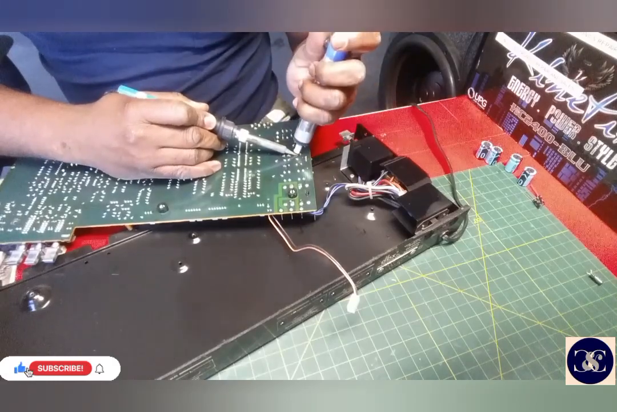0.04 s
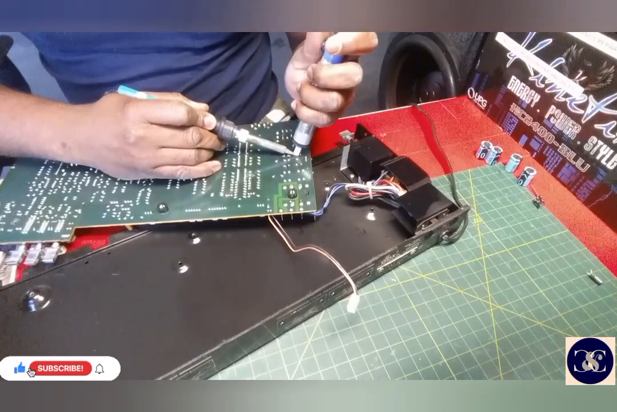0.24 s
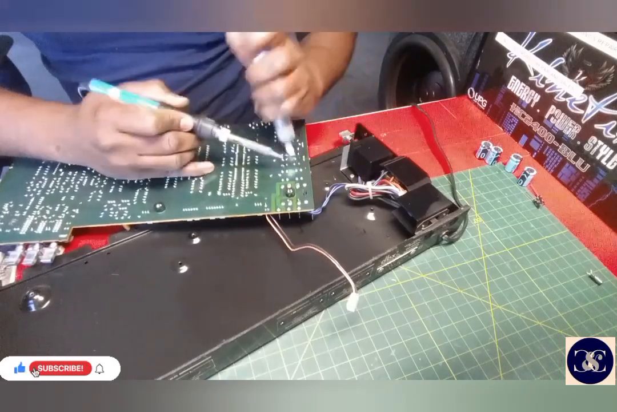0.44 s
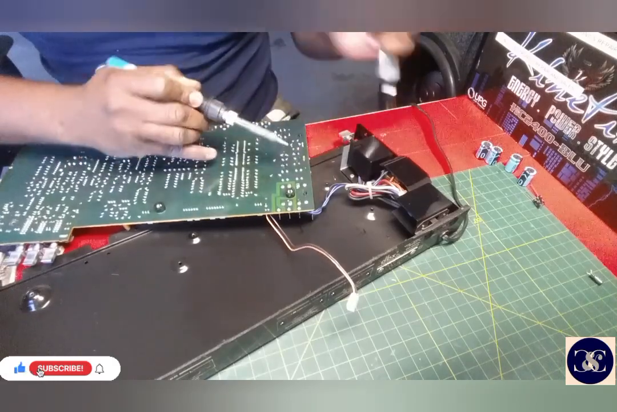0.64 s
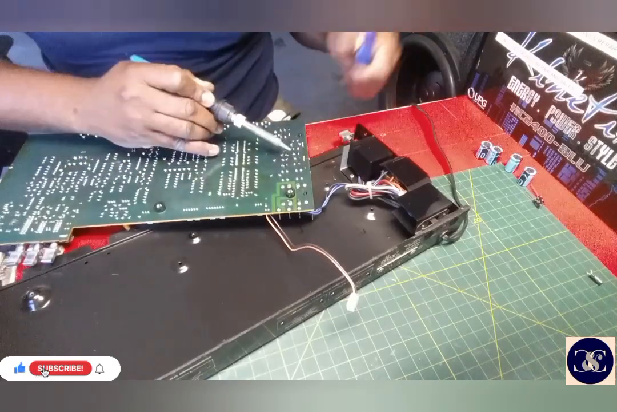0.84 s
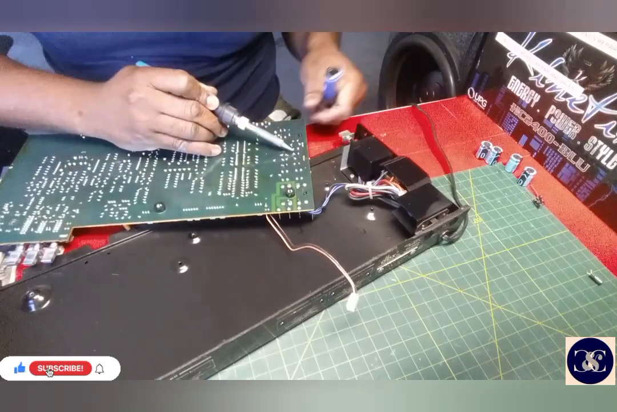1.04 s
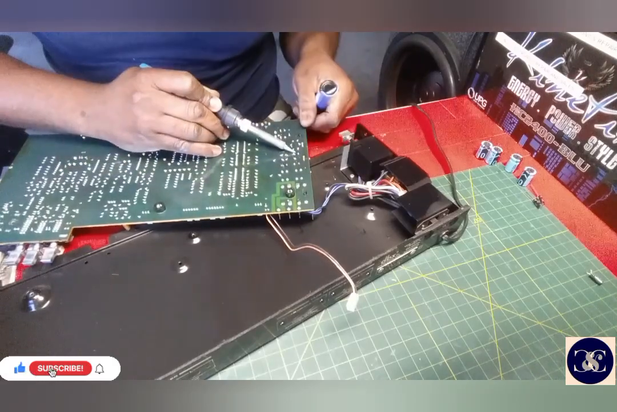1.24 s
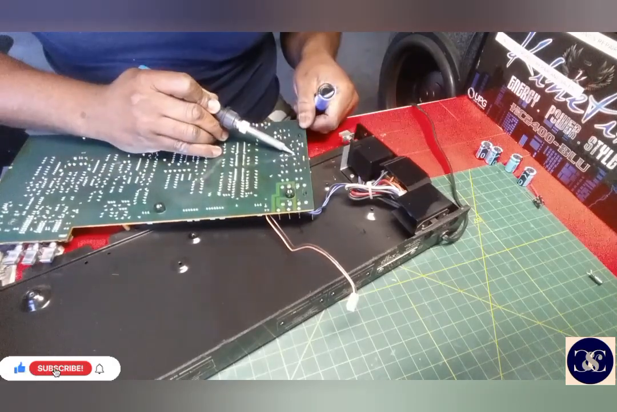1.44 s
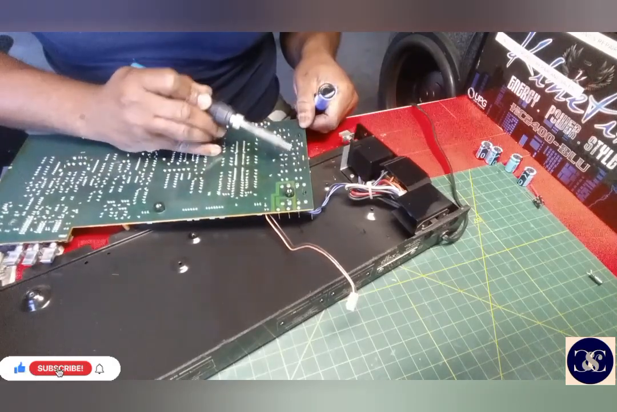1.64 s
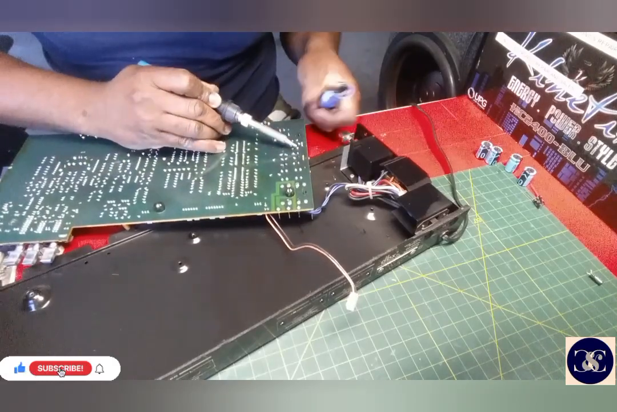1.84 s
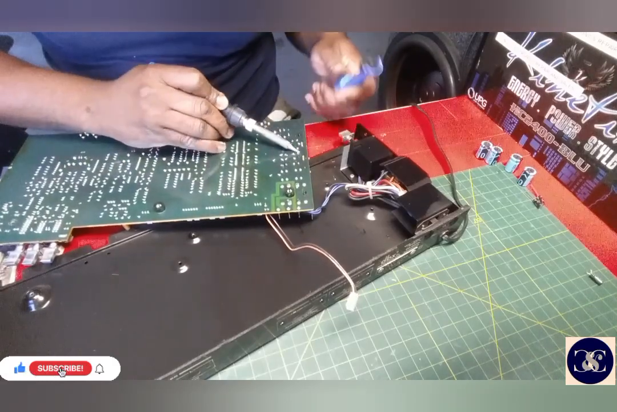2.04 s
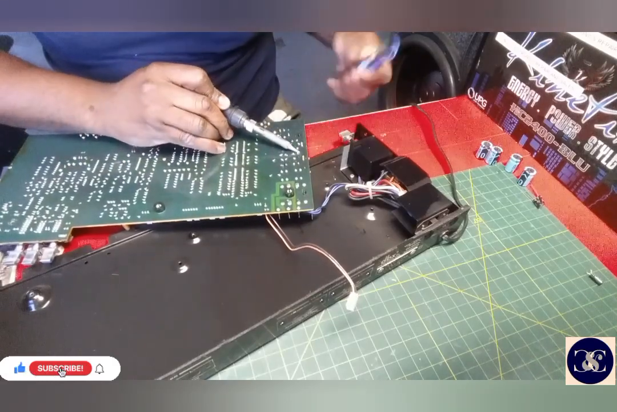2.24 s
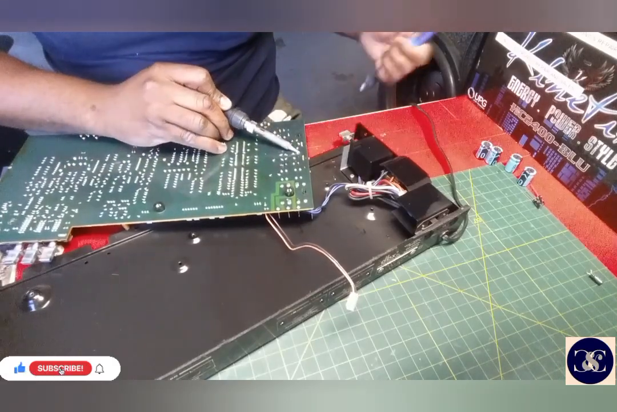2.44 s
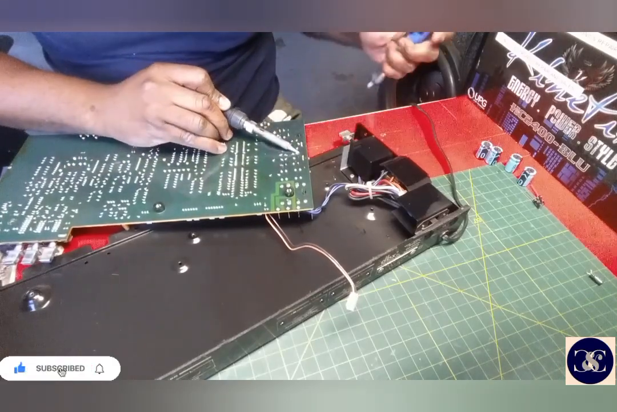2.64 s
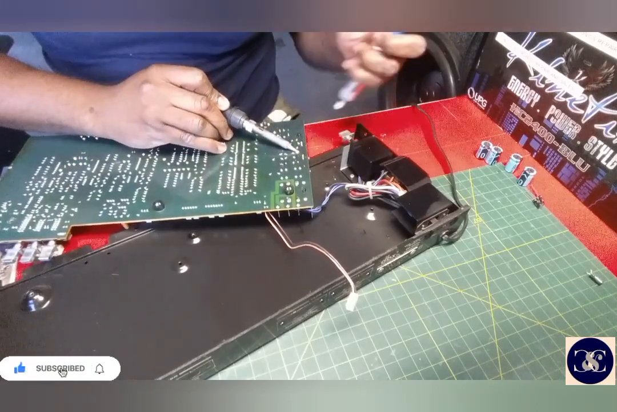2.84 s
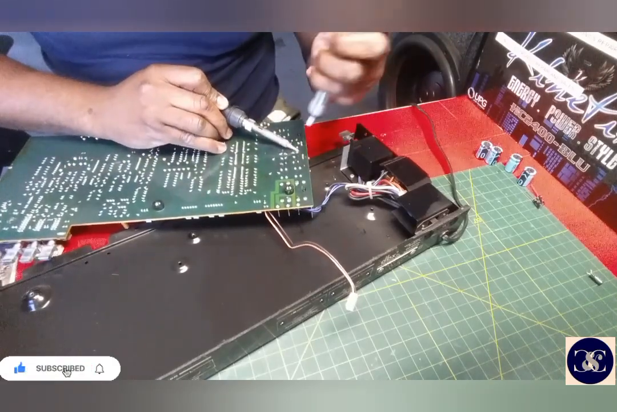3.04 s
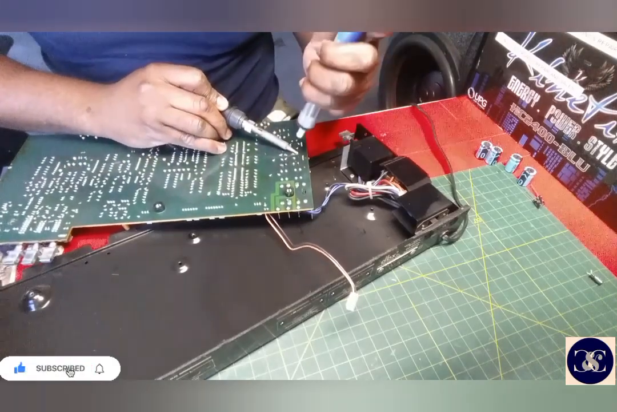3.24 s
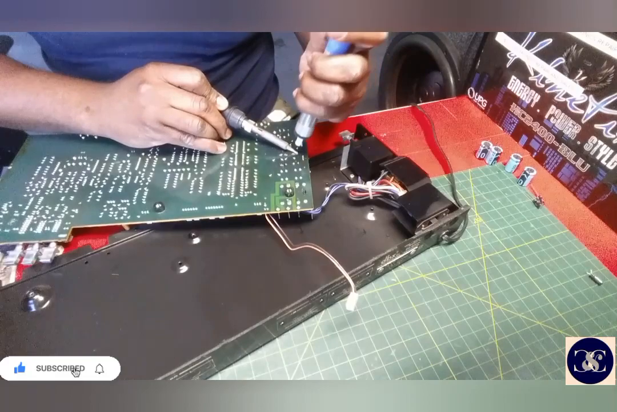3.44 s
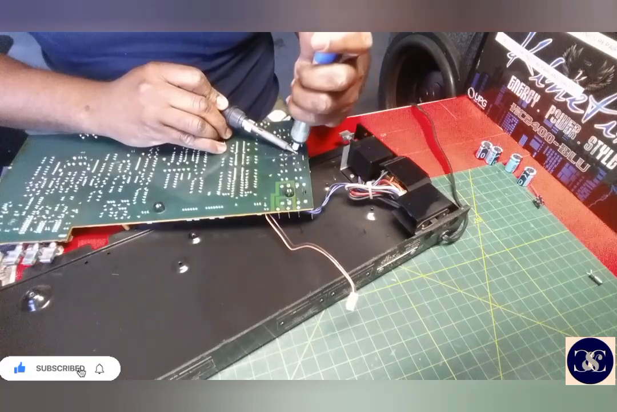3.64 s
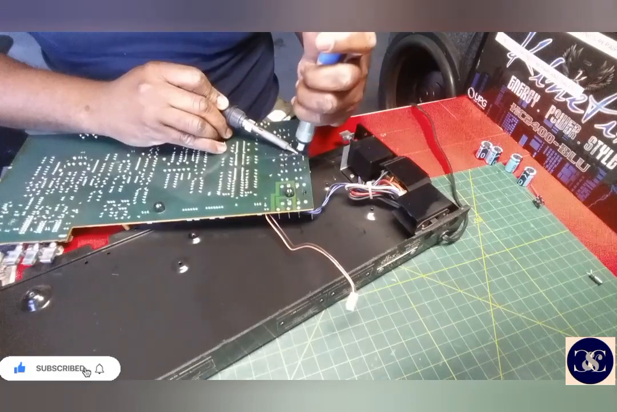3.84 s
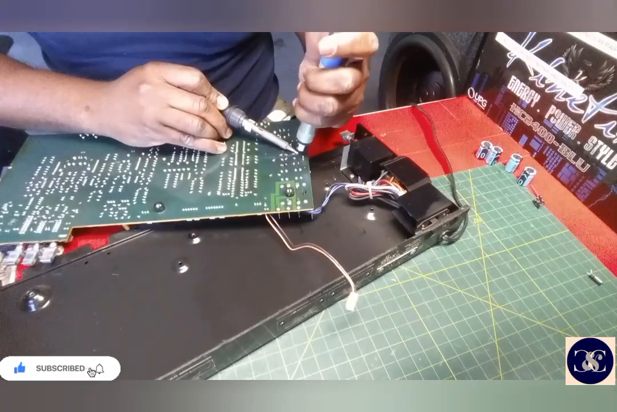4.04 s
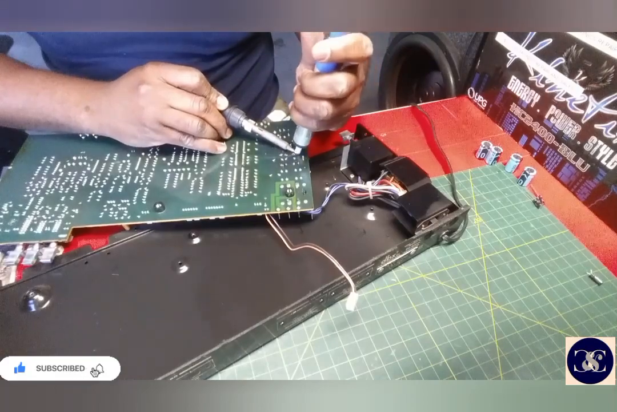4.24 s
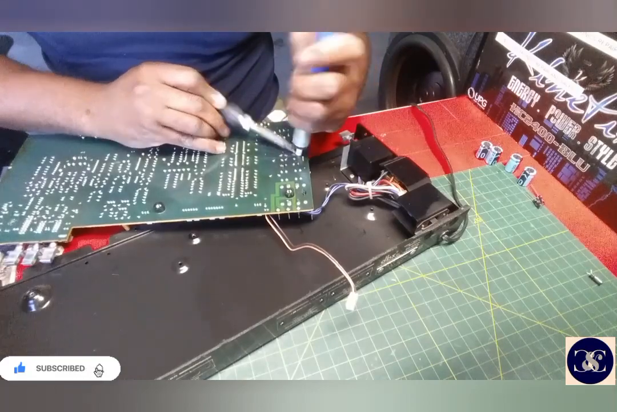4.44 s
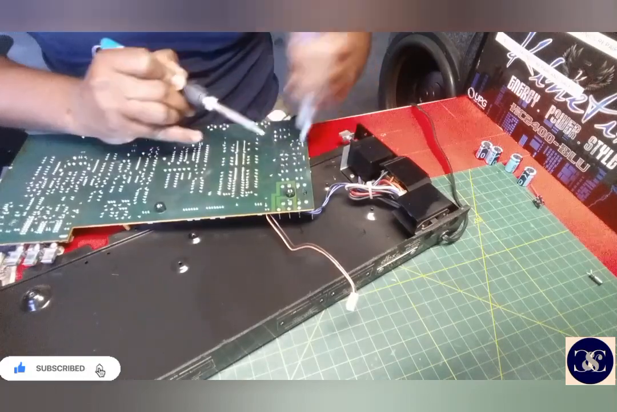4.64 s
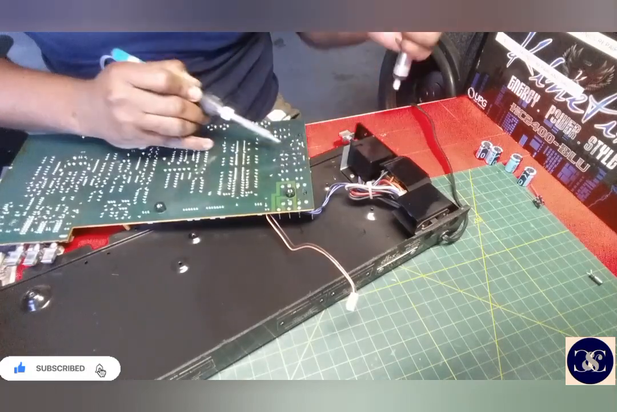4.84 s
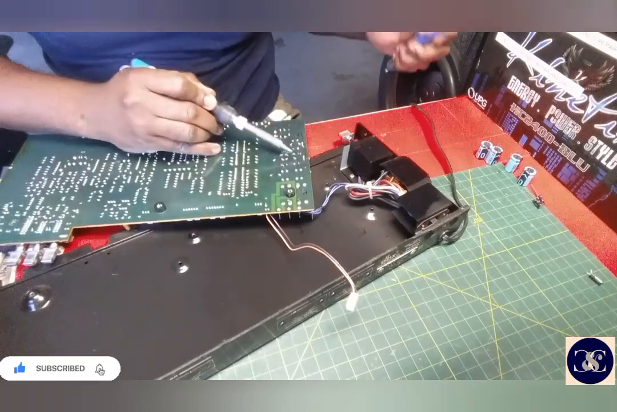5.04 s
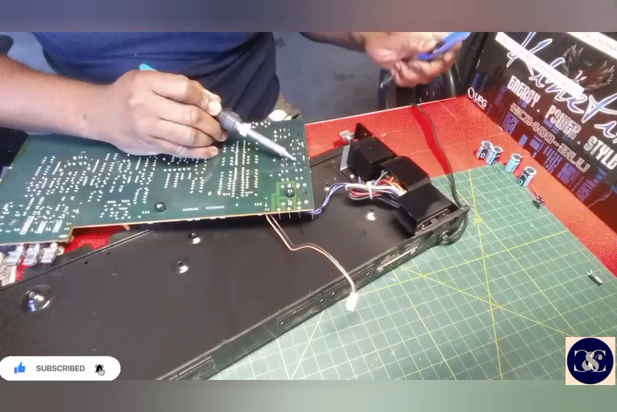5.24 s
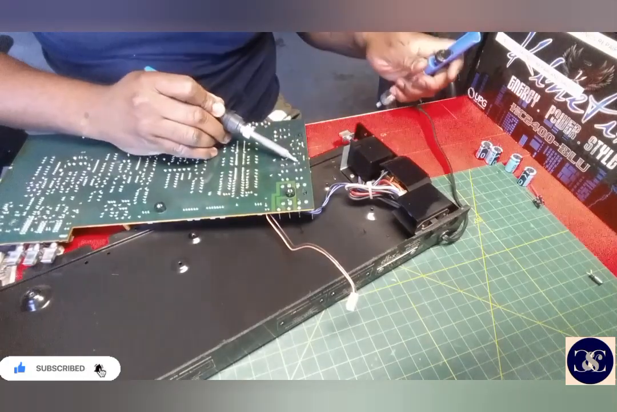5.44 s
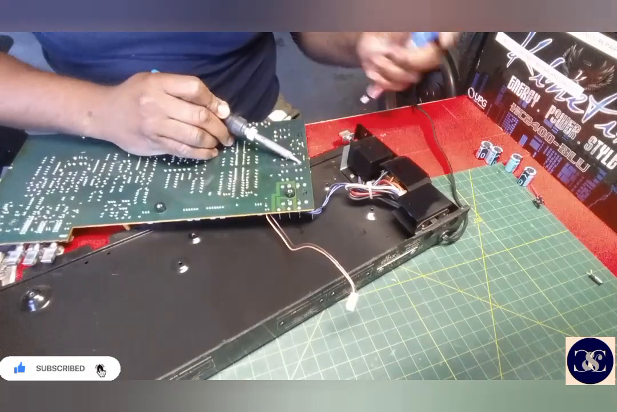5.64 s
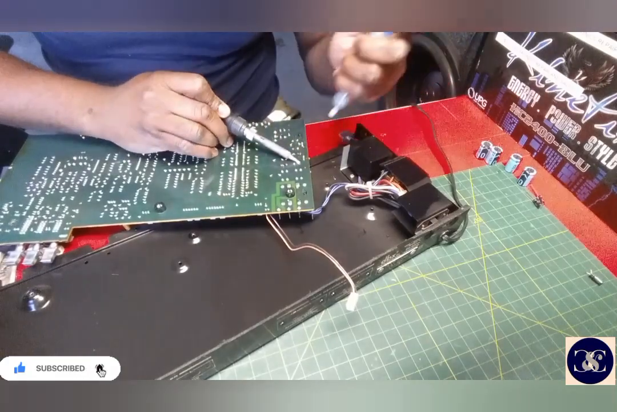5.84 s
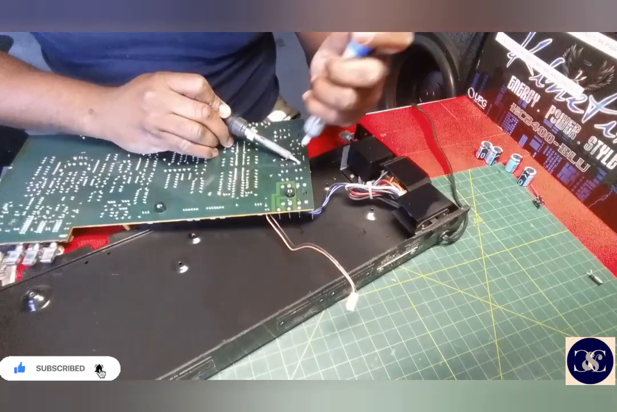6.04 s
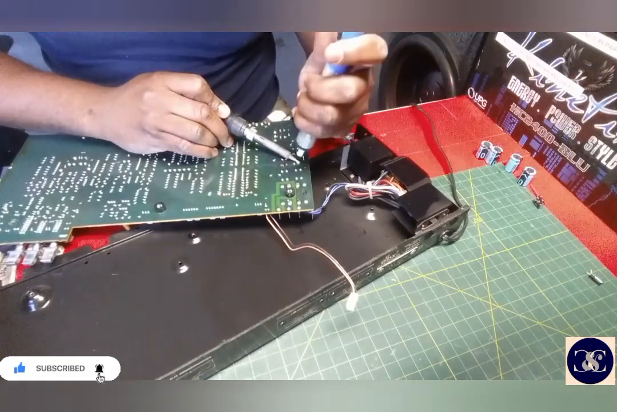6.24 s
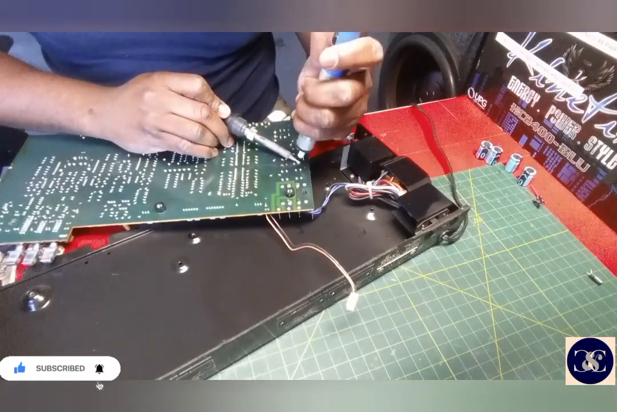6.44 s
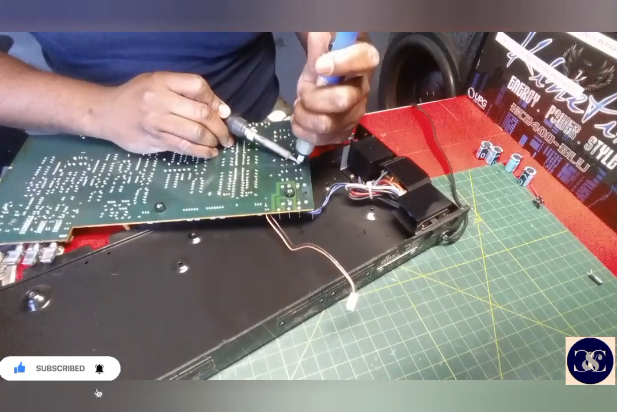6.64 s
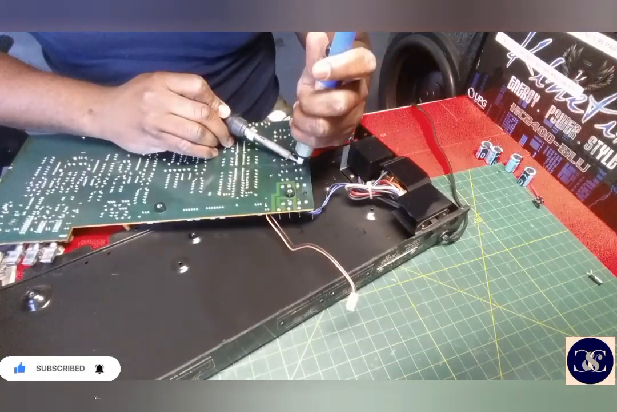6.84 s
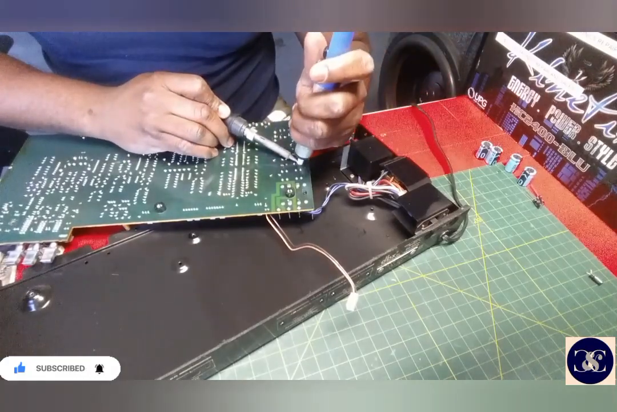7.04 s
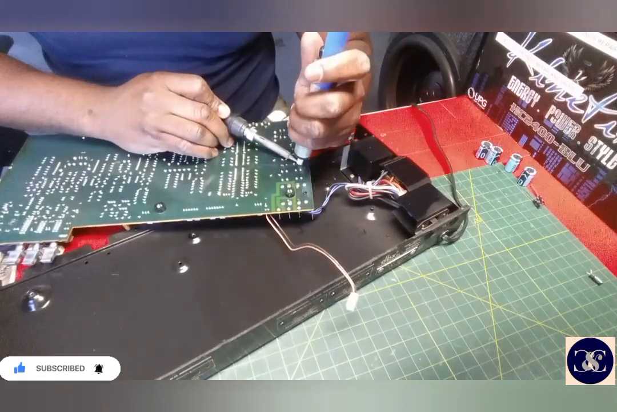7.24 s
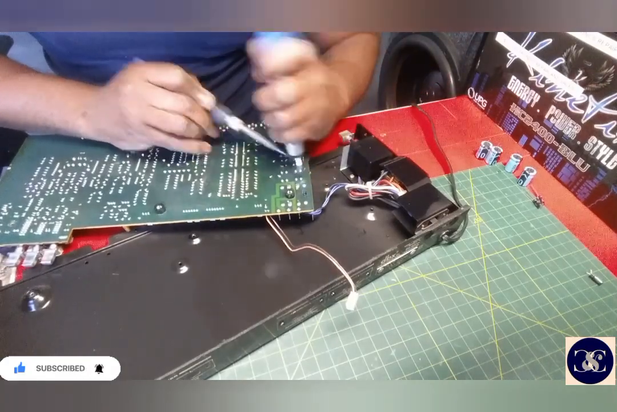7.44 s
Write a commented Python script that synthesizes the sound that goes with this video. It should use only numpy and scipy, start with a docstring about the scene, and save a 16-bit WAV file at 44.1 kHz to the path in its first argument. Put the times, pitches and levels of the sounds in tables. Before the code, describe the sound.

A low electrical hum with rumble and faint hiss runs throughout, swelling at the start, around 2 seconds, around 4 seconds and from 6 seconds onward. At about 0.45 seconds a spring-loaded desoldering pump fires with a sharp snap, and a loose circuit board bounces briefly on its chassis. From 1.7 to 2.4 seconds come small clicks and hollow board knocks. The plunger scrapes in and latches with a loud, bright click at 2.6, followed by a softer click and a small ringing snap near 3 seconds. At 4.6 the pump fires harder, with a short metallic ring and board clatter. It is re-cocked with a lighter click at 5.1 and a faint tick at 5.3. Only the hum remains until a last hard snap at about 7.5 seconds. Everything is close, with short small-room reverberation.

```python
"""A spring-loaded desoldering pump is fired three times and re-cocked twice over a circuit board.
Its piston rushes up the barrel and slams home, exciting the damped modes of spring and barrel; the
plunger scrapes in, latches and slides back. The loose board knocks on its chassis and rings.
A low mains hum swells and sinks; the small room reverberates into two close microphone ports."""
import sys
import numpy as np
from scipy import signal
from scipy.fft import rfft, irfft
from scipy.io import wavfile

SR = 44100
rng = np.random.default_rng(int(sys.argv[2]) if len(sys.argv) > 2 else 0)


def transcribe(u):
    """Save the signal u as a 16-bit wav file named by the first command-line argument.

    u: samples, shape (n,) or (channels, n), limited to [-1, 1]; the rate is SR.
    q: integer samples, one column per channel.
    """
    v = np.clip(np.atleast_2d(u).T, -1, 1)
    q = np.round(v * 32767).astype(np.int16)
    wavfile.write(sys.argv[1], SR, q)


N = 330750
TIME = np.arange(N) / SR
BLOW_TIME = TIME[:SR // 2]

# Modes of the board on its chassis. Each row: frequency in Hz, level in dB, t60 in seconds.
BOARD_MODES = [(36, -10, .25), (58.5, -7, .15), (103.04, -4.5, 0.24), (134.37, 2.5, 0.14), (172, -4, 0.081),
               (220.9, -1.5, .1), (310, -12, 0.08), (349.4, -9.5, 0.082), (403, -9.5, 0.07),
               (507, -10, 0.077), (725, -12, 0.17), (1045, -1.5, 0.065), (1303, -2.5, 0.097),
               (1513, -4.5, 0.058), (2095, -0.5, 0.071), (2600, -6, 0.081), (2940, -5, 0.05),
               (3675, -10, .06), (4420, -8, .08), (6200, -16, 0.055), (6900, -11, .06)]
# Modes of spring and barrel. Each row: frequency in Hz, level in dB, t60 in seconds.
PUMP_MODES = [(1140, -16.5, .16), (1745, -14.5, 0.085), (2131, -11, .17), (2420, -4.5, .12), (2610, 2, .19),
              (2220, -13.5, 0.16), (2015, -13, .13), (2960, -18, .16), (3260, -12.5, 0.15),
              (4280, -12, 0.09), (4740, -16, 0.13), (6340, -11.5, 0.058), (6305, -10.5, 0.14),
              (6230, -9, 0.1), (7100, -9, 0.11), (6770, -7, .1), (7290, -8, 0.14), (7230, -9, .1),
              (9560, -16.5, .08), (10690, -12, 0.14)]
# Lone snaps of the spring. Each row: time in seconds, level in dB, relative thump and ring in dB,
# t60 in seconds.
LONE_SNAPS = [(0.418, -27, -15, -15, 0.058), (2.9717, -19.5, -26, -3.5, 0.085)]
# Firings on the board. Each row: time in seconds, level in dB, relative ring in dB.
FIRINGS = [(0.4489, -12.5, -19.5), (4.5739, -8, -5.5), (7.498, -7, -7.5)]
# Cockings of the plunger. Each row: latch time in seconds, levels of latch, scrape and eased scrape
# in dB, back-stop time in seconds, its level in dB.
COCKINGS = [(2.6034, 1.5, -29, -29.5, 2.7675, -13), (5.091, -7.5, -39, -48, 5.3, -24)]


def amp(db):
    """Amplitude ratio of a level in decibels."""
    return 10 ** (np.asarray(db) / 20)


def along(hz, points):
    """Interpolation of (Hz, value) points on a logarithmic frequency axis."""
    f, value = np.transpose(points)
    return np.interp(np.log(np.maximum(hz, 1)), np.log(f), value)


def response(points, size=2048):
    """Minimum-phase impulse response of unit energy, shaped by (Hz, dB) points."""
    cepstrum = irfft(np.log(amp(along(np.fft.rfftfreq(size, 1 / SR), points))))
    cepstrum[1:size // 2] *= 2
    cepstrum[size // 2 + 1:] = 0
    h = irfft(np.exp(rfft(cepstrum)))
    return h / np.linalg.norm(h)


def coloured(x, points, size=2048):
    """Convolution shapes the spectrum of both channels and conserves the power of white noise."""
    return signal.fftconvolve(x, response(points, size)[None], axes=1)[:, :x.shape[1]]


def port_noise(count, coherent_hz=700):
    """Spatial coherence: white noise at two ports is alike in the bass, unrelated in the treble."""
    mid, side = rfft(rng.standard_normal((2, count)))
    coherence = 1 / (1 + (np.fft.rfftfreq(count, 1 / SR) / coherent_hz) ** 2)
    mid, side = mid * np.sqrt(1 + coherence), side * np.sqrt(1 - coherence)
    return irfft(np.array([mid + side, mid - side]), count) / np.sqrt(2)


def fade(t60):
    """Exponential damping: the level falls 60 dB in t60 seconds."""
    return np.exp(-np.log(1000) * BLOW_TIME / max(t60, .002))


def burst(t60, rise_s):
    """Broadband excitation: the dense chatter of a hard contact as quickly dying noise."""
    return port_noise(len(BLOW_TIME)) * fade(t60) * (1 - np.exp(-BLOW_TIME / rise_s))


def ring(modes, colour, scatter_db, spread_hz=1300):
    """Modal superposition: damped sines weighted by the spectrum of the blow."""
    out = 0
    for hz, db, t60 in modes:
        size, polarity, *lag = rng.standard_normal(4)
        # high modes reach the two ports out of step
        phase = 2 * np.pi * hz * BLOW_TIME + np.array(lag)[:, None] * hz / spread_hz
        envelope = fade(t60) * (1 - np.exp(-(2 * hz * BLOW_TIME) ** 2))  # half a cycle to build up
        gain = np.sign(polarity) * amp(db + along(hz, colour) + scatter_db * size)
        out = out + gain * envelope * np.sin(phase)
    return out


def add(track, s, sound):
    """Superposition of a sound on the track at s seconds."""
    start = int(np.clip(s * SR, 0, N - 1))
    track[:, start:start + sound.shape[1]] += sound[:, :N - start]


def swelling(hum_lead_s=.1):
    """Exponential relaxation: the dB levels of rumble, hum and hiss ease up, then sink back to rest."""
    # Each row: start, end and rise time in seconds, gains of rumble, hum and hiss in dB.
    swells = [(0.146, .66, 0.23, 17, 18.5, 23), (1.53, 2.56, .12, 18, 10, 29.5),
              (3.77, 4.62, 0.34, 16, 21.5, 26.5), (6.138, 7.6, 0.39, 15.5, 22.5, 25.5)]
    levels = np.array([[-54.5], [-57], [-91]])
    sink_s = np.array([[.16], [.2], [.42]])
    t = np.array([TIME, TIME + hum_lead_s, TIME])
    for start, end, rise_s, *gains_db in swells:
        rise = 1 - np.exp(-np.clip(t - start, 0, end - start) / rise_s)
        sink = np.exp(-np.maximum(t - end, 0) / sink_s)
        levels = levels + np.array(gains_db)[:, None] * rise * sink
    return levels


def background(waver_db=-2.5, waver_hz=6, microphone_db=-90):
    """Line and continuous spectra: mains hum, rumble and hiss swell over steady microphone noise."""
    # Spectra of rumble, hiss and hum. Each row: frequency in Hz, level in dB.
    rumble_colour = [(12, -51), (20, -24), (43, -7.5), (60, -2.5), (86, -6), (108, -4), (123, -1.5),
                     (166, -16), (362, -34.5), (500, -39.5), (650, -72), (1100, -120)]
    hiss_colour = [(210, -34), (350, -5), (633, -10.5), (928, -14), (1160, -11.5), (1570, -18), (3980, -25),
                   (4520, -28.5), (7190, -27.5), (8310, -36.5), (13600, -27), (16000, -26.5)]
    hum_lines = [(57.5, -3), (119.5, -0.5), (239, -27), (357, -35.5)]
    rumble_db, hum_db, hiss_db = swelling()
    rumble = coloured(port_noise(N), rumble_colour + [(900, -71), (3000, -110)], size=16384)
    hiss = coloured(port_noise(N), hiss_colour)
    hum = 0
    for hz, db in hum_lines:
        waver = np.interp(TIME * waver_hz, np.arange(100), rng.standard_normal(100))
        hum = hum + amp(db + waver_db * waver) * np.sin(2 * np.pi * (hz * TIME + rng.random()))
    noise = amp(rumble_db) * rumble + amp(hiss_db + 4.5) * hiss + amp(microphone_db) * port_noise(N)
    return noise + np.sqrt(2) * amp(hum_db - 2.5) * hum


def board_landings():
    """Rebound: a knock and any evenly spaced bounces, each with more thump and less edge."""
    # Each row: time in seconds, level in dB, relative thump and edge in dB, number of bounces,
    # gap in seconds, loss per bounce in dB.
    knocks = [(0.252, -69.5, 33.5, -11.5, 0, 0, 0.5), (0.586, -22, -14, 4, 0, 0, 0.5),
              (.602, -26.5, -3, 5.5, 3, .0255, 4.5), (1.241, -58.5, 2, -4, 0, 0, 0),
              (1.546, -51.5, 15.5, -29, 0, 0, 0), (1.653, -43.5, 8, 8, 1, .054, -2.5),
              (1.734, -26, -2.5, -20, 2, .033, 5.5), (1.854, -39, 6.5, -7, 0, 0, 0),
              (1.953, -21, -3, -15, 1, .0615, 10.5), (2.0366, -26.5, -6, -7.5, 1, .043, 5),
              (2.726, -40, 1.5, -2, 0, 0, 2), (2.884, -53.5, -6.5, 5, 0, 0, 0),
              (3.27, -60, 13, -2.5, 0, 0, -4), (4.5045, -26, 4.5, -7, 0, 0, 0),
              (4.55, -43, 23, -2.5, 0, 0, 0), (4.7118, -24, -15, 2, 0, 0, 0),
              (4.76, -26, -11.5, 7.5, 3, .0435, 10), (5.66, -59.5, 12, -7.5, 0, 0, -1.5),
              (7.474, -39, 19, 1, 0, 0, 0)]
    for s, db, thump_db, edge_db, bounces, gap_s, loss_db in knocks:
        for k in range(1 + round(bounces)):
            yield s + k * gap_s, db - k * loss_db, thump_db + 1.5 * k, edge_db - 6 * k


def board_knocks():
    """Plate vibration: the board drops on its chassis, giving a hollow clack and ringing bending modes."""
    # Spectrum of the clack. Each row: frequency in Hz, level in dB.
    clack_colour = [(150, -8), (400, -8.5), (650, -11), (1050, 1), (1400, -1), (1750, -7), (2100, -5),
                    (3200, -10), (7000, -12.5), (9000, -23), (16000, -34.5)]
    clacks, board = np.zeros((2, 2, N))
    for s, db, thump_db, edge_db in board_landings():
        edge = [(1800, 0.0018), (4000, edge_db)]
        colour = [(hz, level + along(hz, edge)) for hz, level in clack_colour]
        add(clacks, s, amp(db - 3.5) * coloured(burst(0.049, rise_s=0.0034), colour))
        thump = [(200, thump_db + 6.5), (600, 0.0084)]  # a soft push favours the low modes
        add(board, s, amp(db - 12) * ring(BOARD_MODES, thump + edge, scatter_db=3))
    return clacks, board


def piston_strokes(rush_s=.011, draw_s=.135, push_s=.113, grip_s=.022, ease_s=.03, back_s=.012):
    """Piston travel: start and end in seconds, their levels in dB, low edge in Hz, treble gain in dB."""
    for s, db, _ in FIRINGS:  # air rushes in before the slam and dies away after it
        yield s - rush_s, s, db - 18, db - 18, 280, 1.5
        yield s, s + draw_s, -30, -46.5, 600, -1.5
    for s, db, *_ in LONE_SNAPS:
        yield s - .0027, s, db - 35, db - 18, 280, -1.5
    # the push takes hold, builds up and eases before the latch; then the plunger slides back
    for latch_s, _, db, eased_db, stop_s, stop_db in COCKINGS:
        gripped_s, gripped_db = latch_s - push_s + grip_s, db - 6
        yield latch_s - push_s, gripped_s, gripped_db - 19.5, gripped_db, 1900, 3.5
        yield gripped_s, latch_s - ease_s, gripped_db, db, 1900, 3.5
        yield latch_s - ease_s, latch_s, eased_db, eased_db - 3, 3200, -3.5
        yield stop_s - back_s, stop_s, stop_db - 17.5, stop_db - 8.5, 3200, -3.5


def barrel(x, open_hz=960, rise_per_s=2.8, reflection=0.38, paths=4):
    """Comb filtering: reflections in the air column give resonances that rise as the column shortens."""
    round_trip_s = 1 / (open_hz * (1 + rise_per_s * BLOW_TIME))
    out = 0
    for k in range(paths):
        delayed = [np.interp(BLOW_TIME - k * round_trip_s, BLOW_TIME, side, left=0) for side in x]
        out = out + reflection ** k * np.array(delayed)
    return out


def piston_slides(rough_db=2.5, slips_per_s=450, bass_db=-18):
    """Friction and flow noise: the seal scrapes in tiny slips while air hisses through the nozzle."""
    # Spectrum of the scrape. Each row: frequency in Hz, level in dB.
    scrape_colour = [(300, 4), (2100, -4), (3000, -4), (4000, -1.5), (5000, -0.5), (7200, -1.5),
                     (8600, -5.5), (10000, -0.5), (12500, -8), (16000, -19)]
    out = np.zeros((2, N))
    hz = np.geomspace(200, 16000, 60)
    for start, end, start_db, end_db, edge_hz, top_db in piston_strokes():
        length = max(end - start, .004)
        slips = np.interp(BLOW_TIME * slips_per_s, np.arange(1000), rng.standard_normal(1000))
        push = amp(np.interp(BLOW_TIME, [0, length], [start_db, end_db]) + rough_db * slips)
        gate = np.clip(BLOW_TIME / 0.006, 0, 1) * np.clip((length - BLOW_TIME) / 0.0041 + 1, 0, 1)
        # little sound escapes below the low edge
        shelf_db = 20 * np.log10(amp(bass_db) + 1 / (1 + (edge_hz / hz) ** 6))
        db = along(hz, scrape_colour) + shelf_db + along(hz, [(5000, 0.0027), (9500, top_db)])
        scrape = barrel(port_noise(len(BLOW_TIME)) * push * gate)
        add(out, start, amp(-2) * coloured(scrape, np.column_stack([hz, db])))
    return out


def piston_blows():
    """Impact and rebound: the slam and after-blows of each firing, then the lone snaps."""
    # Each row: delay in seconds, relative level, thump and extra ring in dB, t60 in seconds.
    slam = [(0, 0, -5, -1, .045), (.0195, -9, -6, 5.5, .06), (.027, -12.5, 5, 4, .04),
            (.05, -13, -3.5, 0.5, .085)]
    for s, db, ring_db in FIRINGS:
        for delay_s, relative_db, thump_db, extra_db, t60 in slam:
            yield s + delay_s, db + relative_db, thump_db, ring_db + extra_db, t60
    yield from LONE_SNAPS


def piston_snaps():
    """Impulsive excitation: the piston cracks against its stop, kicks the board and rings the spring."""
    # Spectrum of the crack. Each row: frequency in Hz, level in dB.
    crack_colour = [(120, -14), (200, -7), (400, -9.5), (700, -16), (1250, -10), (2000, -10.5), (2700, -13),
                    (3600, -11), (5700, -11), (6900, -7), (8400, -17.5), (10100, -15.5), (16000, -25.5)]
    blows, spring = np.zeros((2, 2, N))
    for s, db, thump_db, ring_db, t60 in piston_blows():
        # fired in the air, away from the board, the crack has less bass
        bass = [(500, 0.49 * min(thump_db + 6.5, 0)), (2000, 0.003)]
        colour = [(hz, level + along(hz, bass)) for hz, level in crack_colour]
        crack = amp(-1) * coloured(burst(t60, rise_s=0.00045), colour)
        kick = amp(thump_db) * ring(BOARD_MODES, [(500, -5), (1000, -20.5)], scatter_db=2.5)
        add(blows, s, amp(db) * (crack + kick))
        ringing = ring(PUMP_MODES, [(3000, -5), (7000, -4.5), (10000, -13.5)], scatter_db=-2.5)
        add(spring, s, amp(db + ring_db) * ringing)
    return blows, spring


def plunger_clicks(reference_db=-20):
    """Brief contact, wide spectrum: small hard parts tick, rattle and excite the pump's high modes."""
    # Loose clicks of trigger and plunger. Each row: time in seconds, level in dB, relative treble
    # and ring in dB.
    loose_clicks = [(1.6593, -36, -25, -6.5), (1.7313, -13, -10, -6.5), (1.8944, -17, -25, -3),
                    (1.94, -18.5, -27.5, -2.5), (2.0376, -29, -23, -14), (2.15, -35.5, -36, -12),
                    (2.3382, -28, -18.5, -18.5), (2.358, -26.5, -14, -14.5), (2.4758, -41.5, -10.5, -17),
                    (2.5572, -9.5, -25, -12), (2.928, -46.5, -31, -8), (4.5413, -35.5, -0.5, -21.5),
                    (4.6343, -33.5, 2, -26), (4.691, -31.5, 3, -19), (7.3108, -53, -14.5, -17),
                    (7.453, -43, -22.5, -7)]
    # Spectrum of the tick. Each row: frequency in Hz, level in dB.
    tick_colour = [(200, -16.5), (900, -17), (2500, -14), (3500, -7.5), (5000, -4), (6000, -4), (7300, -1),
                   (8600, -14), (10200, 0), (12000, -9), (16000, -17.5)]
    contacts = list(loose_clicks)
    for latch_s, latch_db, _, _, stop_s, stop_db in COCKINGS:
        contacts += [(latch_s, latch_db, -14.5, -25.5), (stop_s, stop_db, -13.5, -31)]
    ticks, metal = np.zeros((2, 2, N))
    for s, db, top_db, ring_db in contacts:
        force_db = db - reference_db  # a harder click is thinner and rattles slightly longer
        body_db = -8.55 - .95 * force_db
        rattle_t60 = .033 * np.exp(.008 * force_db)
        tilt = [(2000, body_db), (3500, 0), (10500, 0), (13000, 0.61 * (top_db + 11.5))]
        colour = [(hz, level + along(hz, tilt)) for hz, level in tick_colour]
        tick = amp(-1.5) * burst(0.002, rise_s=.0001)
        rattle = amp(-6.5) * burst(rattle_t60, rise_s=0.0002)
        add(ticks, s, amp(db) * coloured(tick + rattle, colour))
        add(metal, s, amp(db + ring_db) * ring(PUMP_MODES, [(2600, -24), (4200, -6)], scatter_db=-1))
    return ticks, metal


def room(x, build_s=0.0064):
    """Diffuse reverberation: sound from either side returns to both ports as a decaying noise tail."""
    # Reverberation times. Each row: frequency in Hz, t60 in seconds.
    decay_times = [(100, .3), (1000, 0.43), (2200, 0.4), (4000, 0.34), (7000, 0.33), (10500, 0.28),
                   (16000, 0.12)]
    out = 0
    for side in x:
        hz, t, cells = signal.stft(port_noise(SR), SR, nperseg=256)
        decay = np.exp(-np.log(1000) * t / along(hz, decay_times)[:, None])
        tail = signal.istft(cells * decay, SR)[1][:, :SR]
        tail = tail * (1 - np.exp(-(TIME[:SR] / build_s) ** 2))
        out = out + signal.fftconvolve(side[None], tail / np.linalg.norm(tail), axes=1)[:, :N]
    return out


def scene():
    """Superposition of the direct sound of pump and board, its reverberation and the background."""
    snap, spring = piston_snaps()
    click, metal = plunger_clicks()
    knock, board = board_knocks()
    slide = piston_slides()
    ringing = spring + metal + board
    # only a little of the ringing reaches the room
    radiated = amp(-13.5) * (snap + knock) + amp(-14.5) * click + amp(-21) * slide + amp(-24) * ringing
    return snap + click + knock + slide + ringing + room(radiated) + background()


def record(dry, top_hz=16000):
    """Port resonance colours each channel; the loudest peaks clip and a low-pass cuts the top."""
    # Responses of the microphone ports. Each row: frequency in Hz, left and right gain in dB.
    ports = [(60.7, -2, -2.5), (198, 3, 1.73), (450, 1.5, -4), (1250, 3.5, 1), (2200, 5, 0.5),
             (3400, 4.5, -4.5), (6300, 5.5, -13.5), (7770, 6, -7.5), (8700, -4, 3), (10100, -5.5, 5.5),
             (11500, 0.5, 1.5), (16220, 2.5, 2.5)]
    hz, *sides = np.transpose(ports)
    heard = []
    for x, db in zip(dry, sides):
        h = response(np.column_stack([hz, db]))
        heard.append(signal.fftconvolve(x, h * amp(db[0]) / h.sum())[:N])
    low_pass = signal.ellip(8, .2, 70, top_hz, fs=SR, output="sos")
    return signal.sosfilt(low_pass, np.clip(heard, -1, 1))


dry = scene()
out = record(dry)
transcribe(out)
```